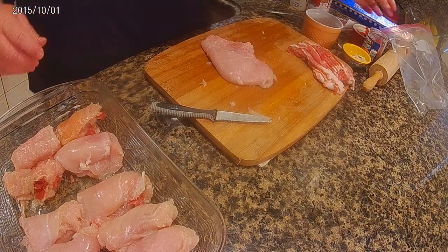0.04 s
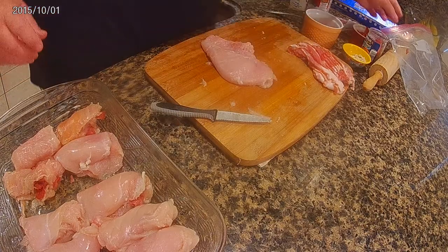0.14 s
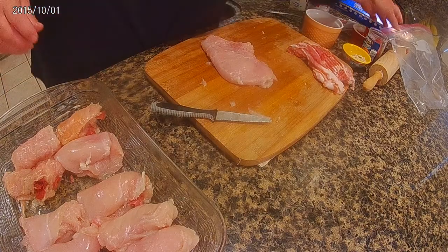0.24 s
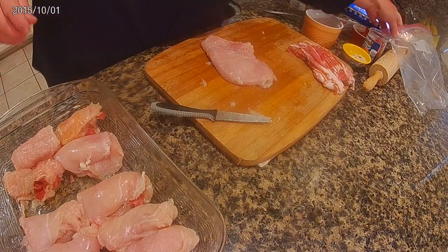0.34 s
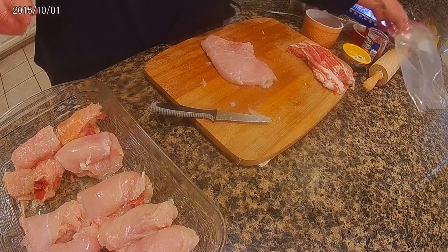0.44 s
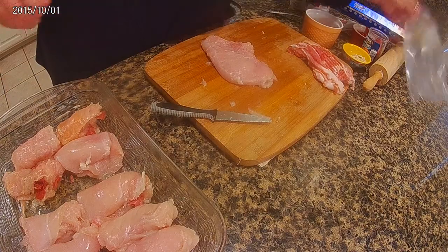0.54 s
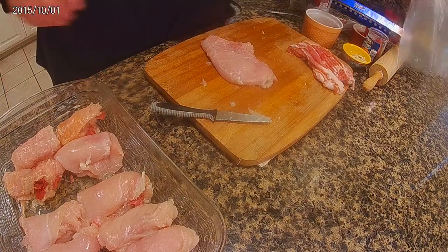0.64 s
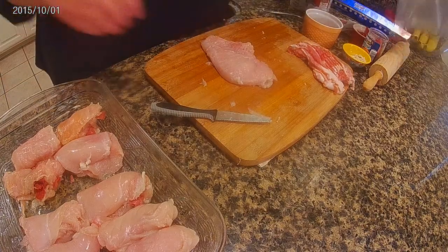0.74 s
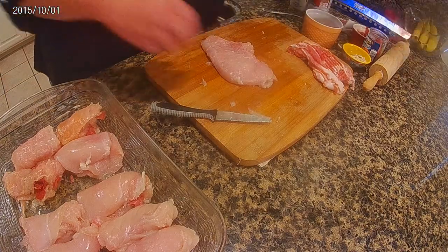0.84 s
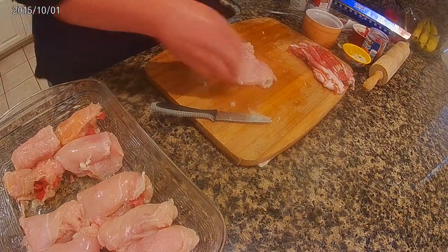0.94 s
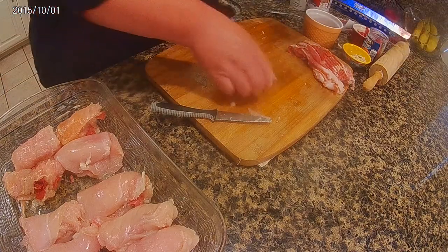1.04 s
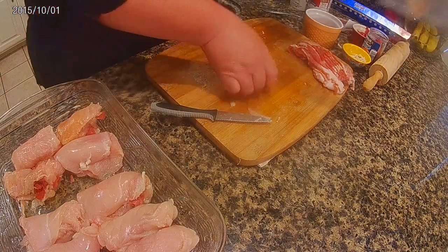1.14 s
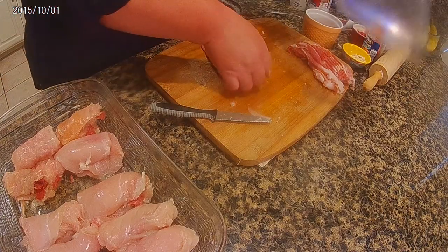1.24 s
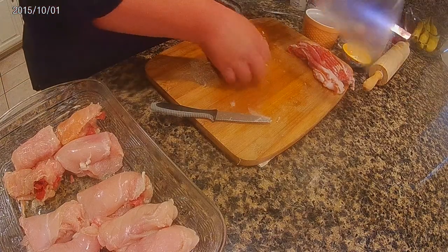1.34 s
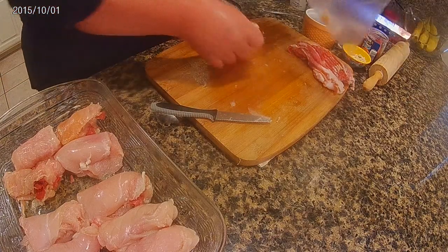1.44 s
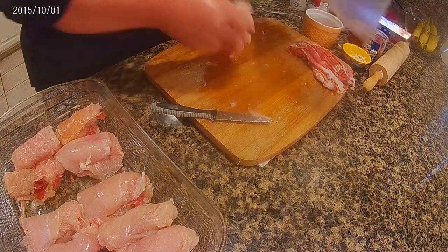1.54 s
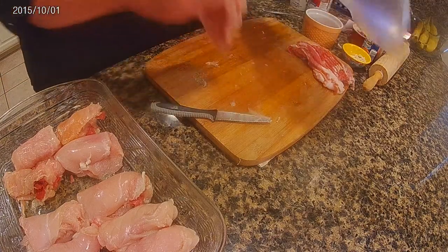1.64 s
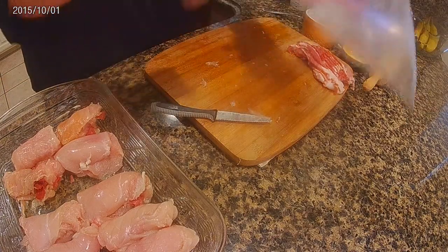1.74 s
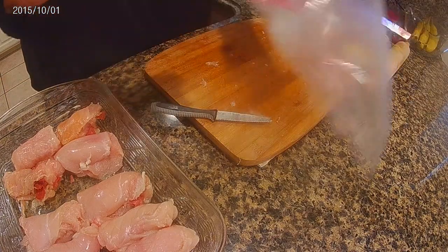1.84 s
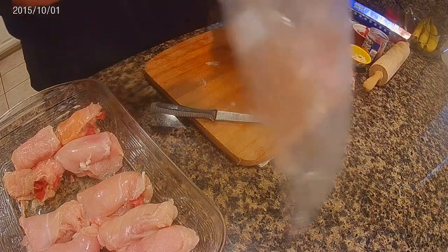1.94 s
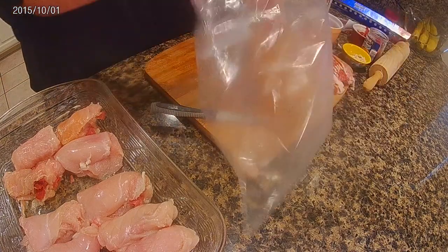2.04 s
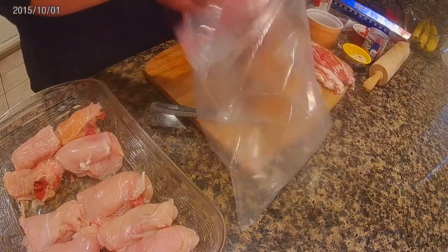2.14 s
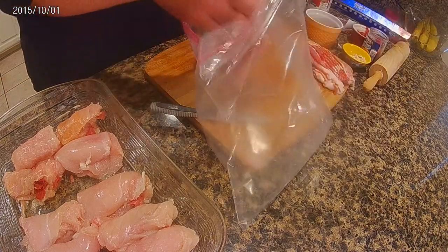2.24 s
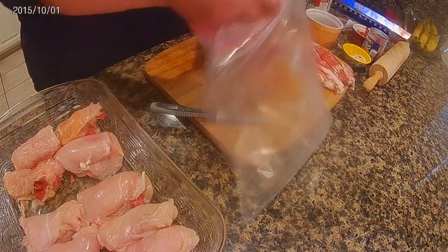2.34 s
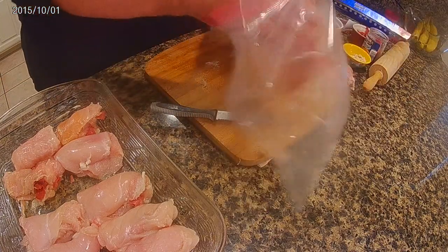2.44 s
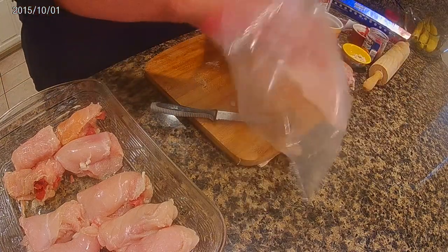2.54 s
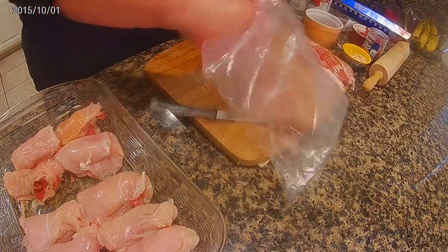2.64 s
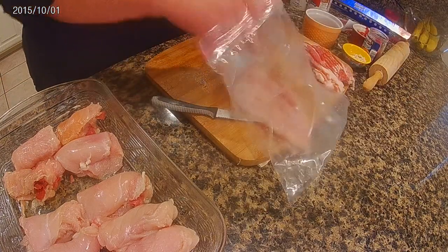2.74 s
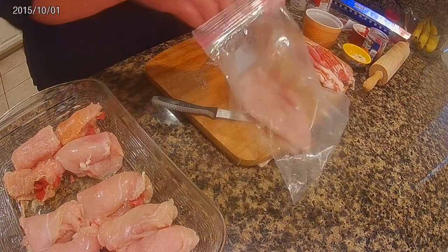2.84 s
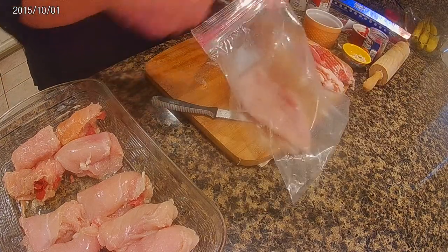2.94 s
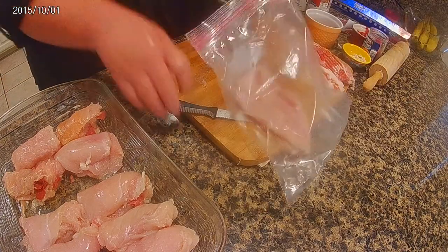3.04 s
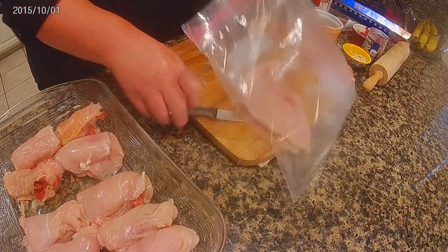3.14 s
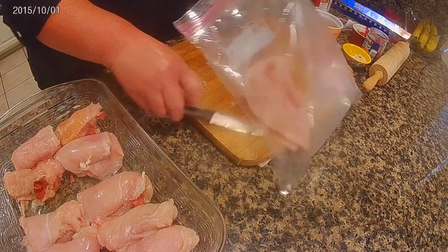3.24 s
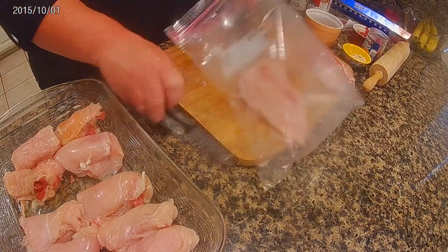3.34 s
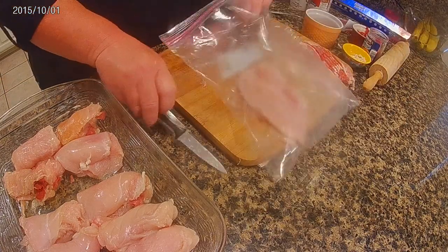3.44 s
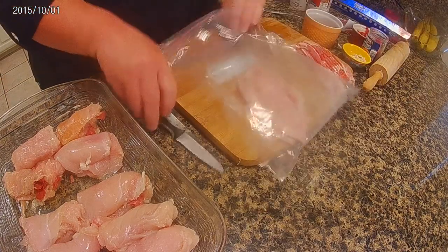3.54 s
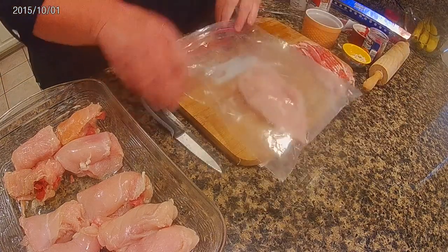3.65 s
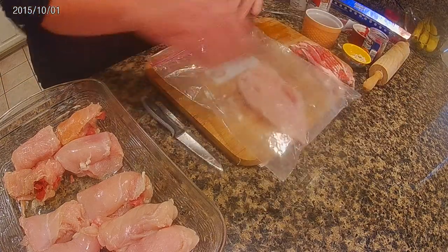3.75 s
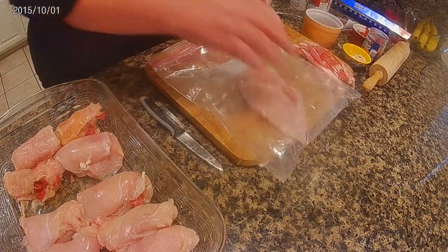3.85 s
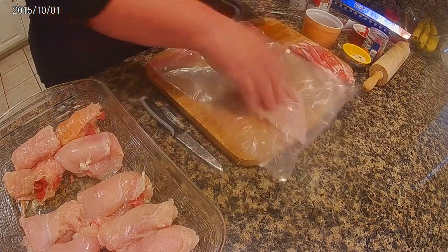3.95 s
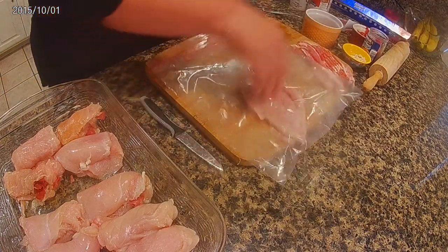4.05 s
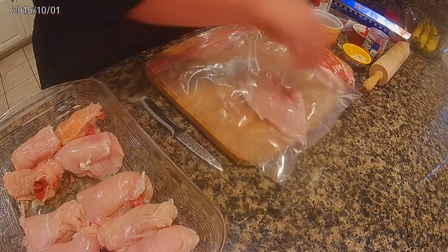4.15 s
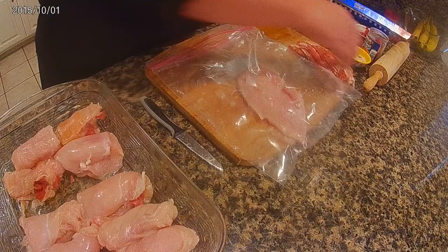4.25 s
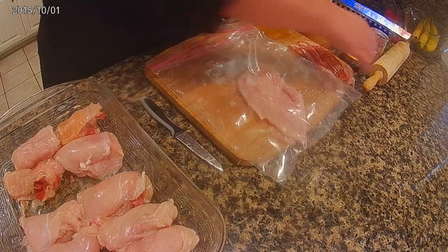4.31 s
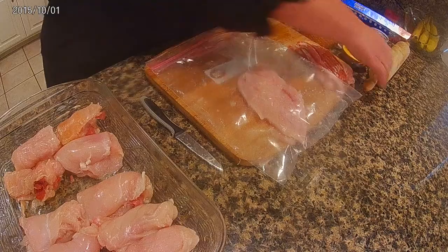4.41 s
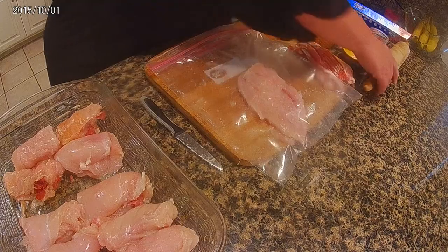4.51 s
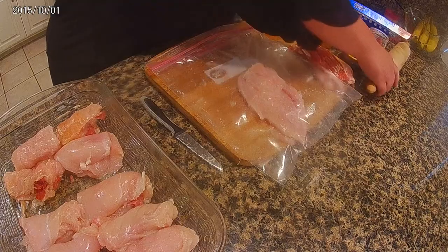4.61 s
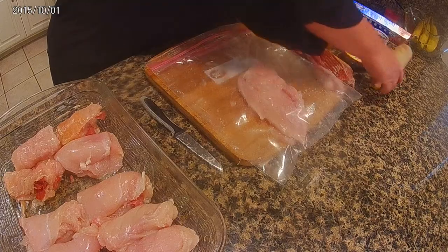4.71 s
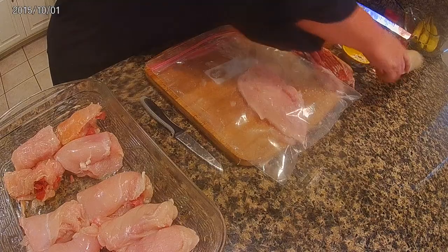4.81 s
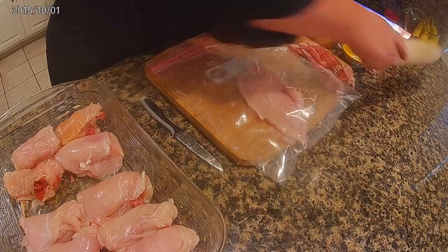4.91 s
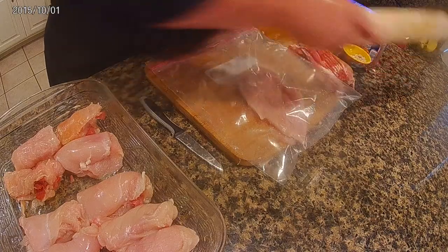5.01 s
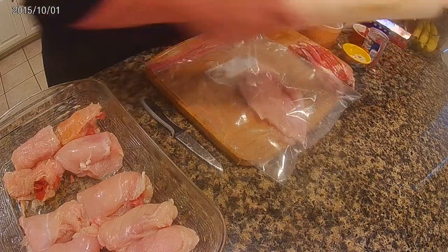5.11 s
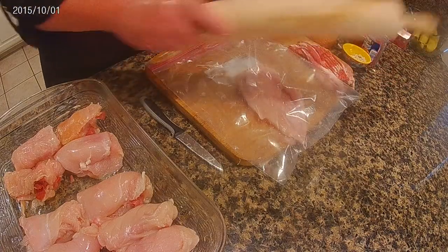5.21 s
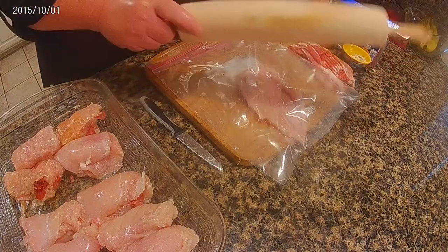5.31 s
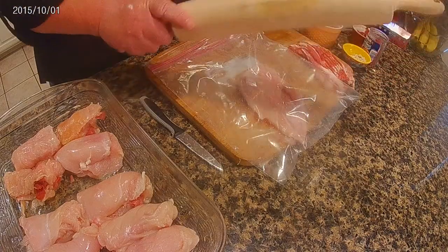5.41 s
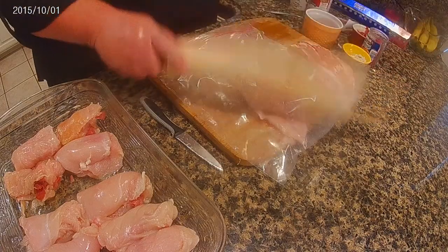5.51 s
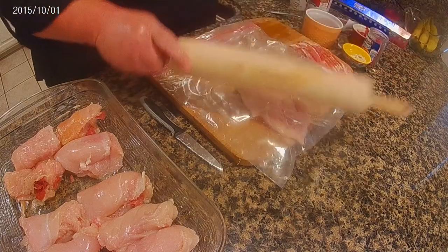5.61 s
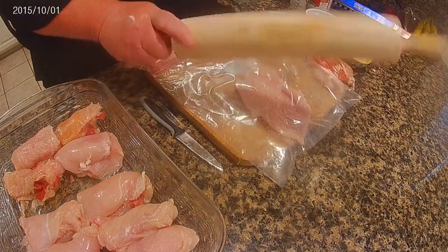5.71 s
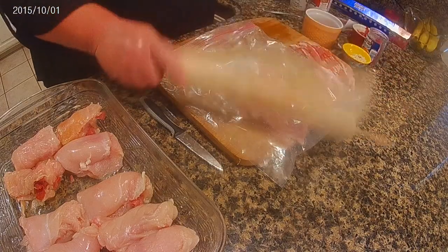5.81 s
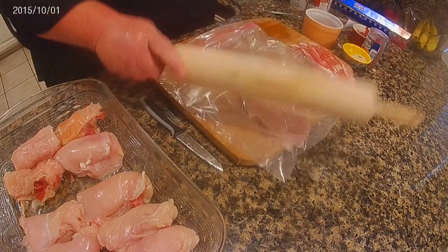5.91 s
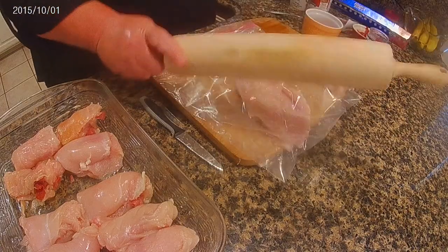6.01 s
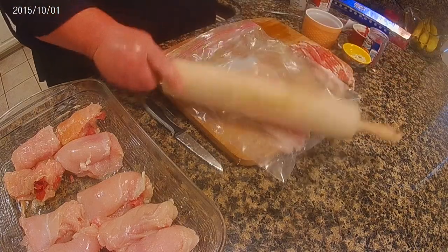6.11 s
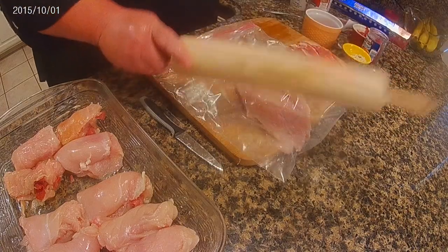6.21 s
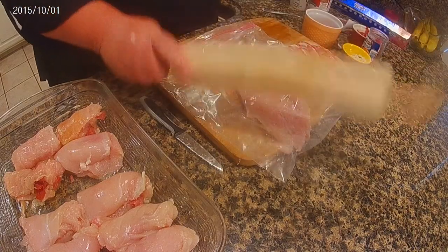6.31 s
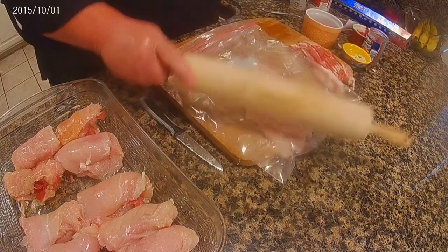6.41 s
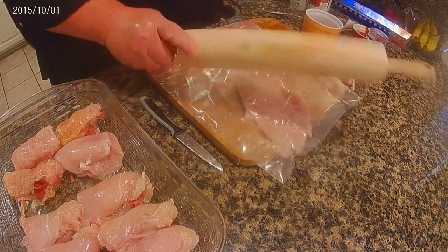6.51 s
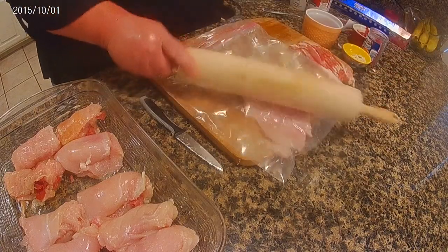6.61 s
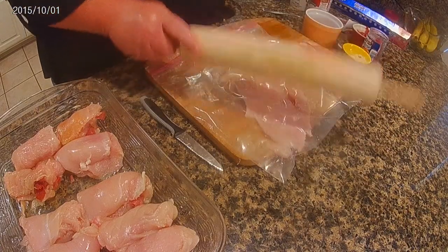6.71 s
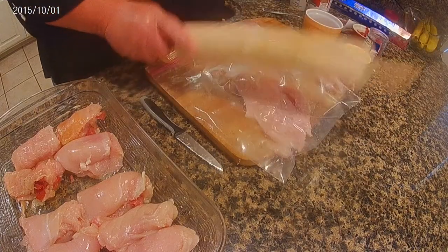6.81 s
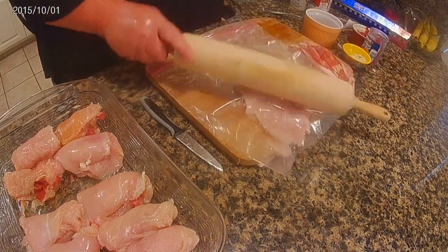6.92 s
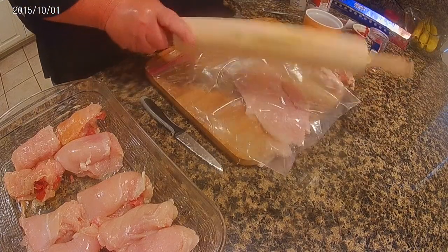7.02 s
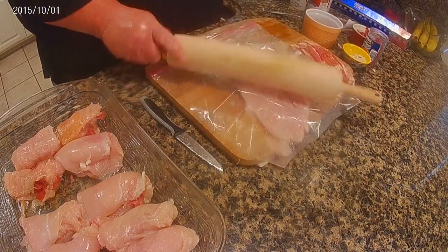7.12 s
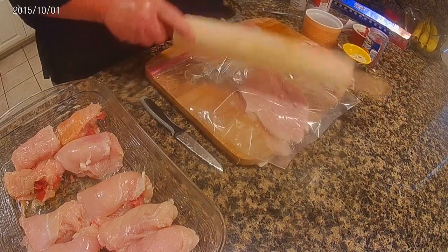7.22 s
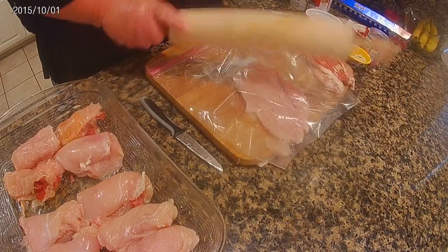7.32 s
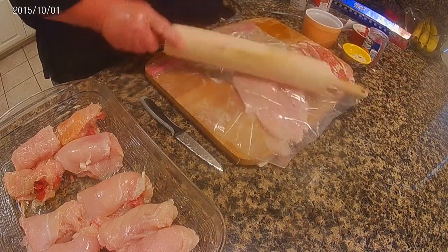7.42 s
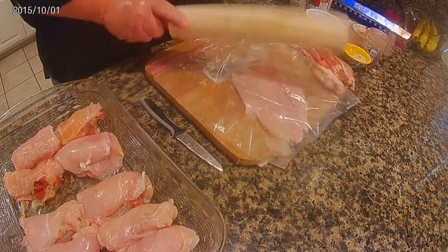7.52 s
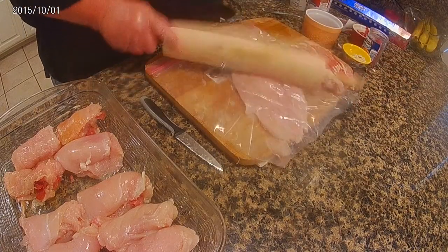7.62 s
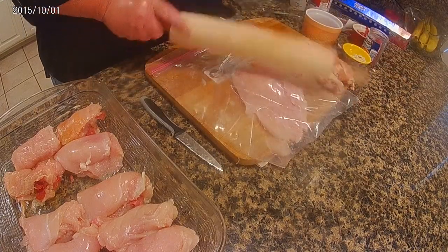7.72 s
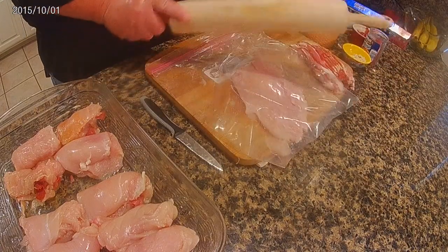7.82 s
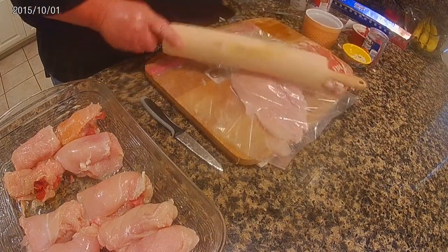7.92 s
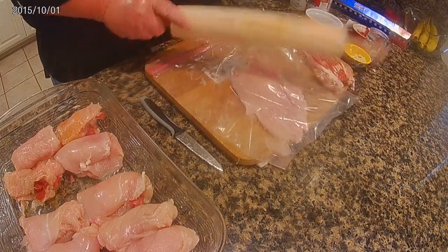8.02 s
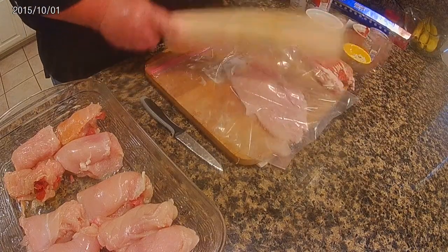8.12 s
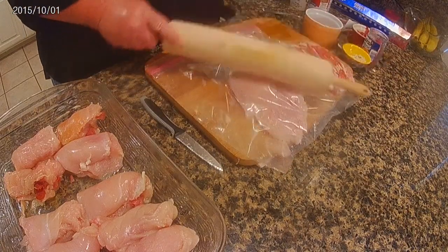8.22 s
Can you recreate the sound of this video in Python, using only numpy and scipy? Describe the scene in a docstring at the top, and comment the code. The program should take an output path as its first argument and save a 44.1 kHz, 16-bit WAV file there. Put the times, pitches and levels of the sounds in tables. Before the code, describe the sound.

Close up in a hard-walled kitchen with a faint hum, thin plastic swishes and meat is picked up with a small wet smack. The bag rustles in bursts, with light knocks on a cutting board. Then a rolling pin beats the bagged chicken about four times a second, mixing plastic slaps, dull thuds and wooden clacks as its loose barrel rattles. The next-to-last blow is the loudest.

```python
"""Kitchen, hard-walled, with a soft rush of air and a faint hum; close microphone.
A plastic bag slides off the counter, crinkles as its folds buckle around a chicken breast,
and is laid on a wooden board. A rolling pin pounds it eleven times: the film slaps, the meat smacks,
board and counter thud, the pin clacks and its barrel rattles on a loose axle."""
import sys
import numpy as np
from scipy import signal
from scipy.fft import rfft, irfft
from scipy.io import wavfile
from scipy.ndimage import uniform_filter1d, minimum_filter1d

SR = 44100
rng = np.random.default_rng(int(sys.argv[2]) if len(sys.argv) > 2 else 0)


def output_pcm(signal):
    """Save a mono or channel-first signal as 16-bit PCM at the path in sys.argv[1].

    Samples are clipped to [-1, 1] before scaling.
    """
    pcm = np.clip(np.atleast_2d(signal).T, -1, 1) * 32767
    wavfile.write(sys.argv[1], SR, np.round(pcm).astype(np.int16))


N = 364266
T = np.arange(N) / SR
AGE = np.arange(SR // 2) / SR  # time within one event [s]

# room air spectrum (frequency [Hz], gain [dB])
AIR_EQ = [(25, -17.5), (60, -12.5), (90, -17), (130, -4), (250, -1), (400, -1), (750, -2), (1100, -5),
          (1600, -12), (2300, -17), (3250, -12.5), (4000, -20), (8000, -17)]
# faint tones in the air (frequency [Hz], level [dB])
HUM_TONES = [(120, -69), (732, -66.5), (813, -63.5), (942, -71.5)]
# kitchen reverberation (frequency [Hz], gain [dB], t60 [s])
REVERB_BANDS = [(60, -4.5, 0.57), (157, 2, 0.36), (424, -3.5, 0.38), (1000, -4.5, 0.52), (2500, -7.5, 0.53),
                (4870, -6, 0.48), (10000, -10.5, .3)]
# microphone response (frequency [Hz], gain [dB])
MIC_EQ = [(30, 3.5), (80, 1), (1600, 0.5), (2700, -5.5), (3250, -13.5), (3900, -6), (4900, -13),
          (5800, -16), (7000, -26), (8500, -37.5), (11000, -45), (15500, -43.5)]
# microphone hiss spectrum (frequency [Hz], gain [dB])
HISS_EQ = [(1000, -17), (10000, -8), (12000, -4.5), (14000, 5.5), (16000, -1)]

# bag sliding off the counter (time [s], level [dB])
SLIDE_ENVELOPE = [(0, -61.5), (.1, -48), (.2, -44.5), (.27, -43.5), (.38, -45), (.5, -58), (.62, -59),
                  (.8, -56.5)]
# bag lifted, held, swung, opened, filled, meat dropping in, shaken, lowered, laid down
# (start [s], length [s], crinkle level [dB], creases re crinkle [dB])
BAG_MOVES = [(0.417, 0.16, -48, -9), (0.865, 0.78, -57, -15), (1.894, 0.063, -40, -7),
             (2.027, .15, -47.5, -4.5), (2.23, 0.35, -48, -5), (2.554, 0.24, -53.5, 1.5),
             (2.883, 0.28, -45, -10), (3.344, 0.14, -44.5, -4.5), (3.475, .16, -47.5, -5)]
# bag spectra: sliding, crinkling, sharp creases (frequency [Hz], gain [dB])
SLIDE_EQ = [(150, -24.5), (500, -6.5), (1150, -2.5), (2000, -11.5), (3000, -6), (4000, -5.5), (5000, -18),
            (9000, -25)]
CRINKLE_EQ = [(40, -45), (150, -29), (400, 3.5), (800, -2), (1400, 4), (2100, -6.5), (3500, -9),
              (8000, -19.5)]
CREASE_EQ = [(100, -40), (1000, -8), (2500, 4.5), (4500, -1), (6000, -5), (9000, -4), (14000, -7)]
# sticky meat picked up (time [s], level [dB], pitch [Hz])
MEAT_GRABS = [(1.0305, -35.5, 1740), (1.121, -50, 1890), (1.295, -51, 4440), (1.323, -51.5, 1930)]
# single folds snapping (time [s], level [dB], pitch [Hz], decay [s])
FOLD_SNAPS = [(0.562, -41, 1810, 0.029), (0.898, -44, 1850, .007), (1.826, -46, 2090, 0.0042),
              (1.9727, -33.5, 2230, 0.0051), (2.302, -43, 4000, 0.0013), (2.425, -45, 4200, 0.0054),
              (2.573, -29, 1670, 0.012), (2.584, -26, 1440, 0.007), (2.64, -36, 1960, 0.0046),
              (2.668, -35, 1660, .0047), (2.910, -38, 1300, 0.022), (3.311, -41, 1980, 0.022),
              (3.365, -49, 1700, 0.0044), (3.481, -30.5, 1350, 0.015), (3.4887, -24, 4830, 0.0025),
              (3.5802, -33, 1670, 0.0036), (3.889, -31.5, 1730, 0.044), (3.903, -32, 1600, 0.014)]
# meat, knife and pin shifted or set down (time [s], bump [dB], decay [s], board ring [dB])
BOARD_BUMPS = [(1.06, -35, 0.018, -51), (2.580, -32.5, 0.017, -40), (2.669, -29, 0.018, -31),
               (3.079, -34, 0.026, -41), (3.489, -30, 0.011, -60), (3.552, -31.5, 0.082, -49),
               (3.898, -47, 0.026, -45), (4.525, -46.5, 0.045, -52.5), (4.602, -54, 0.013, -52)]

# modes: board on counter, board, pin (frequency [Hz], level [dB], t60 [s])
THUD_MODES = [(63.7, -7.5, 0.12), (97, 0.5, 0.18), (120.9, -1, 0.21), (171.4, -5.5, 0.095),
              (227.6, 6.5, 0.037), (284.5, 1.5, 0.077), (340, 0.5, 0.079), (403, -4.5, 0.079)]
BOARD_MODES = [(486.6, 1.5, 0.14), (620, -15.5, .08), (851.6, -7.5, 0.16), (975, -14.5, 0.19),
               (1080, -21.5, 0.091)]
PIN_MODES = [(607, -4.5, 0.18), (732, 2.5, 0.088), (907, -12, 0.04), (1010, -8, 0.077), (1002, -3, 0.2),
             (1073, 0.5, 0.13), (1190, 0, 0.06), (1345, -4, 0.079), (1355, -5, 0.34), (1596, 2, 0.07),
             (2040, -19.5, 0.073), (2150, -15.5, 0.1)]
# impact spectra: film slap, hollow knock, wood crack (frequency [Hz], gain [dB])
FILM_EQ = [(150, -9), (600, 2.5), (1500, 2.5), (2600, 5.5), (4500, 0), (8000, -8), (15000, -5)]
KNOCK_EQ = [(40, -46), (250, -18), (550, -8.5), (750, -0.5), (980, -1), (1300, -5.5), (1900, -15),
            (4000, -22.5), (9000, -44.5)]
CRACK_EQ = [(100, -22), (600, -7.5), (1200, 2.5), (1900, -11.5), (2800, -7.5), (5000, -14.5), (8000, -12.5),
            (14000, -24.5)]
# barrel bouncing on its axle (delay after blow [s], relative level [dB])
AXLE_BOUNCES = [(.026, -5), (.036, -5), (.044, -5.5), (.055, -4.5), (.066, -5.5), (.074, -7.5)]
# pin blows; squareness > 0 lands flat on the meat, < 0 onto the wood
# (time [s], force [dB], squareness [dB], board ring [dB], rattle [dB], axle click [dB])
PIN_BLOWS = [(5.4898, -24.5, 3, -49, -29.5, -28.5), (5.7880, -22.5, 0, -22.5, -20.5, -21.5),
             (6.0503, -23.5, 5, -19.5, -24.5, -27), (6.3120, -26, 7, -19, -26, -26),
             (6.5486, -30, -5, -37, -20.5, -36), (6.8066, -26, -2, -31, -31.5, -29),
             (7.0532, -31.5, -4, -36, -19.5, -42), (7.3100, -25, 0, -35.5, -22, -32.5),
             (7.5692, -24.5, -1, -31.5, -21, -29.5), (7.8354, -7, -.5, -15.5, -14.5, -41),
             (8.0994, -23, 0, -35.5, -19.5, -40)]


def undb(db):
    return 10 ** (np.asarray(db) / 20)


def level(x, db):
    """Scale to an rms level."""
    return x * undb(db) / np.sqrt(np.mean(x ** 2))


def strength(x, db):
    """Scale to the energy of 10 ms at this rms level."""
    return x * undb(db) / np.sqrt(np.sum(x ** 2) / (.01 * SR))


def add(out, time_s, x, db):
    """Mix in a short sound at strength db."""
    i = max(int(time_s * SR), 0)
    out[i:i + len(x)] += strength(x, db)[:max(len(out) - i, 0)]


def log_interp(hz, points_hz, values):
    return np.interp(np.log(hz + 1), np.log(points_hz), values)


def colour(x, eq, size=2048):
    """Minimum-phase filter, via the cepstrum."""
    gain_db = log_interp(np.fft.rfftfreq(size, 1 / SR), *np.transpose(eq))
    cepstrum = irfft(np.log(undb(gain_db)))
    cepstrum[1:size // 2] *= 2
    cepstrum[size // 2 + 1:] = 0
    return signal.fftconvolve(x, irfft(np.exp(rfft(cepstrum))))[:len(x)]


def bandpass(x, hz, q, stages=1):
    for _ in range(stages):
        x = signal.lfilter(*signal.iirpeak(hz, q, fs=SR), x + 1e-18)
    return x


def burst(decay_s):
    """Decaying noise."""
    return rng.standard_normal(len(AGE)) * np.exp(-AGE / decay_s)


def crackle(per_s, spread_db):
    """Random clicks, mostly small."""
    size = undb(spread_db * np.minimum(rng.exponential(size=N), 4))
    return (rng.random(N) < per_s / SR) * size * rng.choice([-1, 1], N)


def ring(modes, detune, scatter_db):
    """Damped modes; tuning and weight vary with each contact."""
    hz, db, t60_s = np.transpose(modes)[:, :, None]
    jitter = rng.standard_normal((len(modes), 2, 1))
    polarity = (-1) ** np.arange(len(modes))[:, None]
    swing = polarity * np.sin(2 * np.pi * hz * (1 + detune * jitter[:, 0]) * AGE)
    fade = np.exp(-np.log(1000) * AGE / t60_s)
    return np.sum(undb(db + scatter_db * jitter[:, 1]) * swing * fade, axis=0)


def air(rush_db=-52.5, hum_width_hz=11):
    """Slightly wavering rush of air with a fan-like hum."""
    waver_db = .4 * np.interp(T, np.linspace(0, T[-1], 50), rng.standard_normal(50))
    rush = level(colour(rng.standard_normal(N), AIR_EQ), rush_db)
    hum = sum(level(bandpass(rng.standard_normal(N), hz, hz / hum_width_hz), db) for hz, db in HUM_TONES)
    return (rush + hum) * undb(waver_db)


def kitchen_reverb(x, build_s=0.0031):
    """Hard walls: a diffuse tail builds, then fades band by band."""
    bands_hz, gains_db, t60s_s = np.transpose(REVERB_BANDS)
    bins_hz = np.fft.rfftfreq(len(AGE), 1 / SR)
    noise, tail = rfft(rng.standard_normal(len(AGE))), 0
    for share, db, t60_s in zip(np.eye(len(bands_hz)), gains_db, t60s_s):
        band = irfft(noise * log_interp(bins_hz, bands_hz, share), len(AGE))
        fade = np.exp(-np.log(1000) * AGE / t60_s) * (1 - np.exp(-(AGE / build_s) ** 2))
        tail += undb(db) * band * fade / np.linalg.norm(fade)
    return signal.fftconvolve(x, tail)[:N]


def bag_slide():
    """Film hisses over the counter in dense clicks."""
    friction = level(colour(crackle(per_s=11000, spread_db=0.5), SLIDE_EQ), 0)
    return friction * undb(np.interp(T, *np.transpose(SLIDE_ENVELOPE), right=-120))


def bag_crinkle(fits_per_s=45, fits_db=6.5, attack_s=0.0053, release_s=0.057):
    """Film buckles in fits with each move, then settles; wide folds pop low, tight ones high."""
    fits = undb(fits_db * rng.uniform(-1, 1, N)[(T * fits_per_s).astype(int)])
    folds = sum(bandpass(crackle(per_s=220, spread_db=1.5), hz, q=0.66) for hz in (790, 1400, 2450, 4200))
    crinkle = level(colour(folds * fits, CRINKLE_EQ), -1)
    creases = level(colour(crackle(per_s=120, spread_db=3) * fits, CREASE_EQ), 0)
    start_s, length_s, db, crease_db = np.transpose(BAG_MOVES)[:, :, None]
    attack = np.clip((T - start_s) / attack_s, 0, 1)
    release = np.exp(-np.clip((T - start_s - length_s) / release_s, 0, 20))
    effort = undb(db) * attack * release
    return crinkle * effort.sum(axis=0) + creases * (effort * undb(crease_db)).sum(axis=0)


def meat_smack(hz, q):
    """Wet contact: a pressure pulse of a few cycles."""
    return bandpass(signal.unit_impulse(len(AGE)), hz, q, stages=3)


def handling():
    """Meat is grabbed, folds snap through and crumple, things bump the board."""
    out = np.zeros(N)
    for time_s, db, hz in MEAT_GRABS:
        add(out, time_s, meat_smack(hz, q=0.67), db)
    for time_s, db, hz, decay_s in FOLD_SNAPS:
        pop = strength(signal.unit_impulse(len(AGE)), -12)
        crumple = strength(burst(decay_s), 0)
        add(out, time_s, bandpass(pop + crumple, hz, q=1.15), db)
    for time_s, db, decay_s, board_db in BOARD_BUMPS:
        add(out, time_s, colour(burst(decay_s), KNOCK_EQ), db)
        add(out, time_s, ring(BOARD_MODES, detune=0.006, scatter_db=1), board_db)
    return out


def film_slap(lead_s, decay_s=0.0049):
    """Film crackles as air is squeezed out, from first touch until just after the pin lands."""
    swell = np.minimum(AGE / lead_s, 1) ** 0.24
    fade = np.exp(-np.maximum(AGE - lead_s, 0) / decay_s)
    return colour(rng.standard_normal(len(AGE)) * swell * fade, FILM_EQ)


def barrel_rattle(scatter_db=1.5):
    """Hollow knocks of the barrel bouncing on its axle."""
    out = np.zeros(len(AGE))
    for delay_s, db in AXLE_BOUNCES:
        knock = colour(burst(decay_s=0.005), KNOCK_EQ)
        add(out, delay_s, knock, db - scatter_db * rng.standard_normal())
    return out


def pin_clack():
    """Wood modes ring under a short rough crack."""
    modes = ring(PIN_MODES, detune=0.011, scatter_db=3.5)
    crack = colour(burst(decay_s=0.013), CRACK_EQ)
    return strength(modes, 0) + strength(crack, 0)


def pounding(contact_lead_s=0.001175, cushion_s=0.0019, rebound_s=0.0378):
    """Pin strikes bagged meat on the board; a squarer blow gives more smack and thud, less clack."""
    out = np.zeros(N)
    cushion = 1 - np.exp(-AGE / cushion_s)  # meat passes the push on gradually
    for blow, (time_s, force_db, square_db, board_db, rattle_db, click_db) in enumerate(PIN_BLOWS):
        film_lead_s = 0.0038 * np.exp(-0.08 * square_db)  # a square blow expels the air sooner
        add(out, time_s - film_lead_s, film_slap(film_lead_s), -2.5 + 0.7 * force_db)
        add(out, time_s - contact_lead_s, meat_smack(hz=1382, q=1.43), force_db + square_db)
        thud = ring(THUD_MODES, detune=0.016, scatter_db=0.5)
        add(out, time_s, cushion * thud, -25.5 + 0.37 * square_db)
        board = ring(BOARD_MODES, detune=0.0075, scatter_db=5)
        add(out, time_s, cushion * board, board_db)
        add(out, time_s - contact_lead_s, pin_clack(), force_db - square_db)
        squash = bandpass(burst(decay_s=0.016), hz=220, q=0.9, stages=2)
        add(out, time_s, squash, -26 - 1.5 * blow)  # meat gives less as it flattens
        film_lift = bandpass(burst(decay_s=0.0058), hz=3600, q=0.8)
        add(out, time_s + rebound_s, film_lift, click_db - 8)
        axle_click = colour(burst(decay_s=0.0013), FILM_EQ)
        add(out, time_s + rebound_s, axle_click, click_db)
        add(out, time_s, barrel_rattle(), rattle_db)
    return out


def scene():
    """Pounding and bagging, with reverberation, over room air."""
    blows = pounding()
    bagging = bag_slide() + bag_crinkle() + handling()
    reverb = kitchen_reverb(undb(-1.5) * blows + undb(-1) * bagging)
    return (blows + bagging + reverb + air())[None]


def record(dry, hiss_db=-87.5, ceiling_db=-3.8, window_samples=131, cutoff_hz=15900):
    """Dull microphone with faint hiss, peak limiter, low-pass."""
    mic = colour(dry[0], MIC_EQ) + level(colour(rng.standard_normal(N), HISS_EQ), hiss_db)
    gain = np.minimum(1, undb(ceiling_db) / (np.abs(mic) + 1e-9))
    smooth_gain = uniform_filter1d(minimum_filter1d(gain, window_samples), window_samples)
    lowpass = signal.ellip(8, .2, 70, cutoff_hz, fs=SR, output="sos")
    return signal.sosfilt(lowpass, mic * smooth_gain)[None]


dry = scene()
out = record(dry)
output_pcm(out)
```